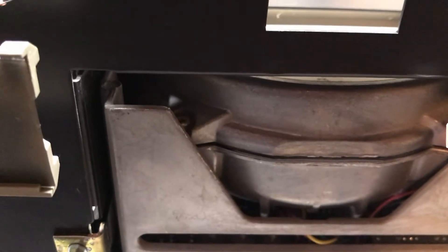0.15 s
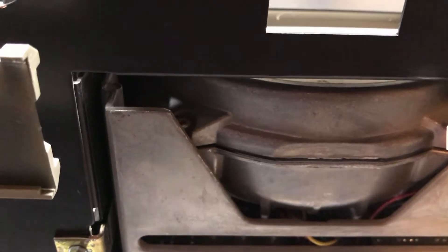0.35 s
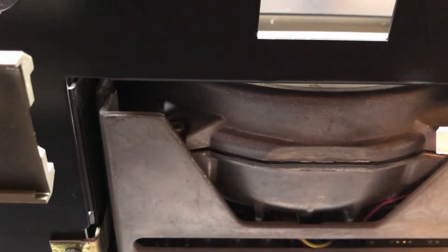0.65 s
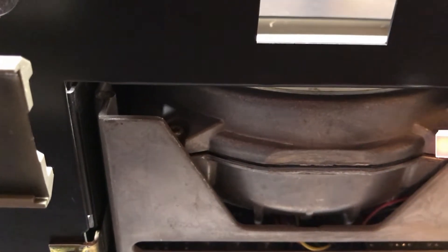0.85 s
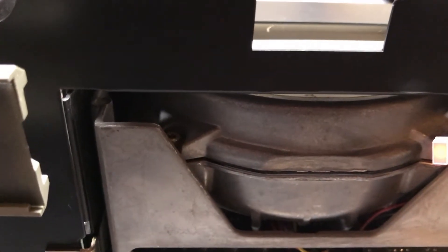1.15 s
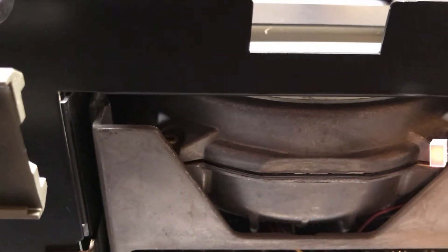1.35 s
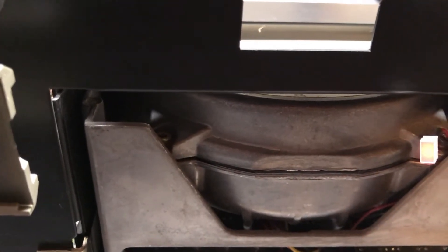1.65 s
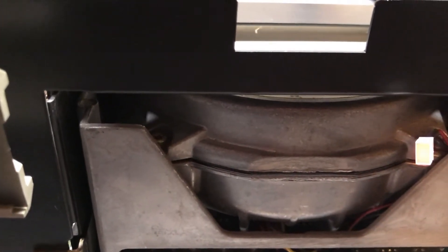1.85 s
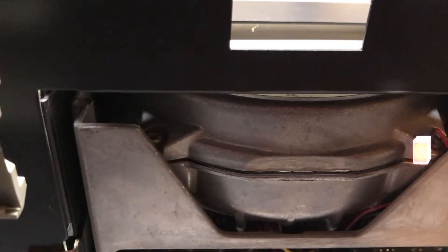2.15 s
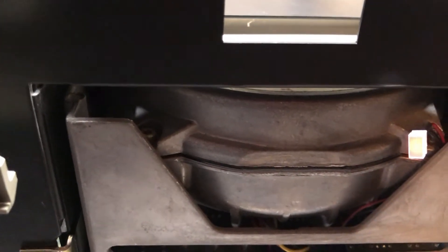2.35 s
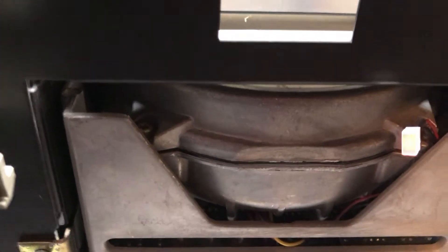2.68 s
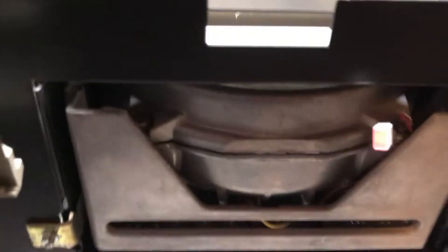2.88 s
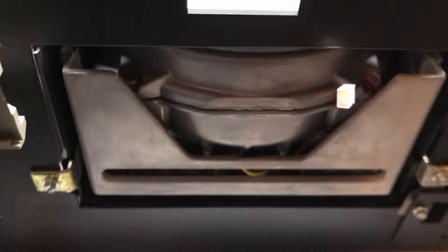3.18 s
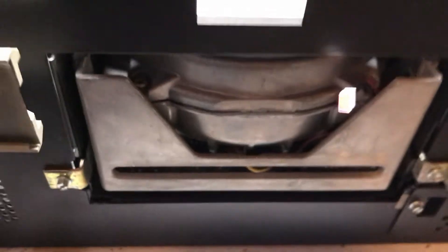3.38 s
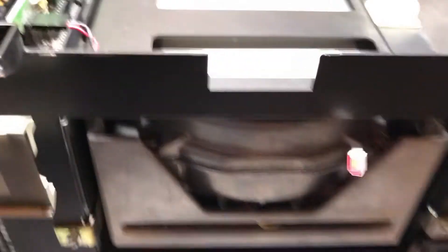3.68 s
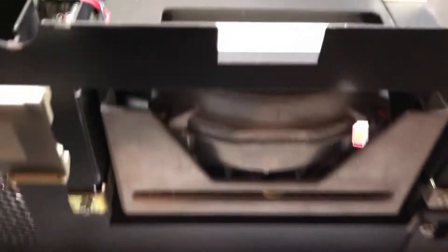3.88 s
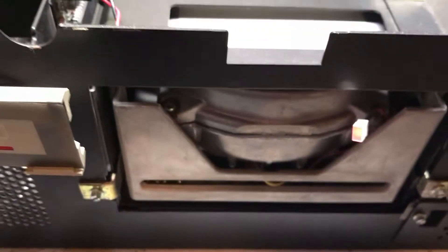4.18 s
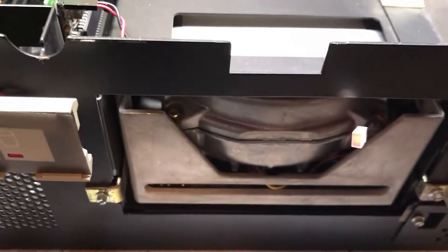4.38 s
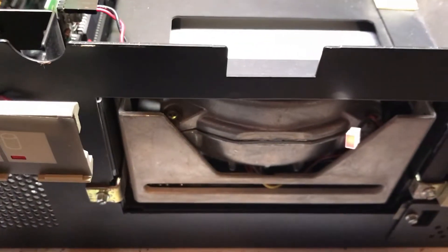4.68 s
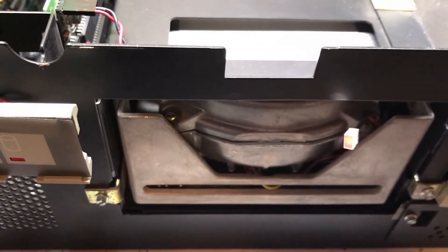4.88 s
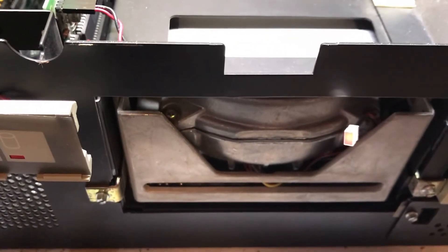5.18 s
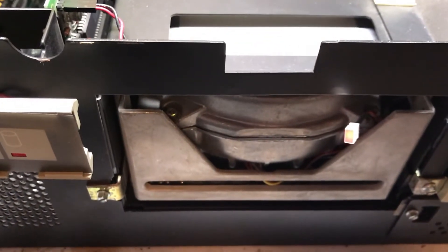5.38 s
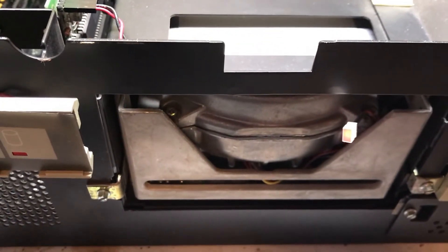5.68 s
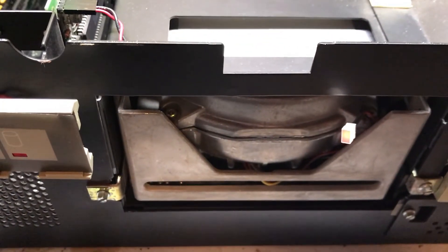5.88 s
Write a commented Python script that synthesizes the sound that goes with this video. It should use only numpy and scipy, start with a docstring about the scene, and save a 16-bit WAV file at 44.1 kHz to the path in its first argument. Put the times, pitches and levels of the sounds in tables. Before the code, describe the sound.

A running old hard drive is heard close up inside an open computer. Throughout, a low 60 Hz platter hum blends with whirring bearings, thin motor whine around 5 kHz, fan tones, airy rush and a faint, wavering whistle near 15.7 kHz. Two seeks rasp immediately at 0.0 s; pairs follow at 0.3 and 0.65 s, then three quick ones at 0.8 to 0.95 s. Each is a gritty metallic buzz of 10 to 35 milliseconds with sharp ticks and a dull low case thump. After a pause, pairs come near 1.6, 1.95, 2.3, 2.7 and 3.15 s, a short tick at 3.6, and a final cluster from 3.86 to 4.2 s. Then no more seeks. The microphone backs away, faster after 3 s, softening the whirr and whine. Tiny falling squeaks near 1 kHz appear around 0.5, 1.1, 3.3, 3.8, 4.3, 4.6, 5.4 and 6 s.

```python
"""Stepper-driven hard drive in an open computer

An old drive seeks in short bursts: each seek is a run of motor steps that rasps through the casting,
ticks in the head arm as it starts and lands, and rocks the chassis. Spindle, motor, bearings, two fans,
rushing air and a monitor whistle drone on as sines and shaped noise, with a few brief squeaks.
The balance of the drone shifts as the microphone draws back, slowly at first, faster after three seconds."""
import sys
import numpy as np
from scipy import signal
from scipy.fft import rfft, irfft
from scipy.io import wavfile
from scipy.ndimage import uniform_filter1d

SR = 44100
rng = np.random.default_rng(int(sys.argv[2]) if len(sys.argv) > 2 else 0)


def materialize(psi):
    """Save the field psi as 16-bit PCM at rate SR to the path in sys.argv[1].

    A 1-D psi becomes a single channel; in a 2-D psi each row is a channel.
    """
    bounded = np.clip(np.atleast_2d(psi).T, -1, 1)
    quanta = np.round(bounded * 32767).astype(np.int16)
    wavfile.write(sys.argv[1], SR, quanta)


N = 266364
T = np.arange(N) / SR  # time [s]
SPINDLE_HZ = 60  # turning rate of the platters
SWITCHES = 6  # switchings of the motor's coils per turn
BRAKE_S = .0065  # the brake bites hardest this long before the landing


def undb(db):
    """Amplitude ratio from its logarithmic level in decibels."""
    return 10 ** (np.asarray(db) / 20)


def unit(x):
    """Normalisation to unit rms, so that a later gain alone sets the level."""
    return x / np.sqrt(np.mean(x ** 2))


def curve(rows):
    """Linear interpolation of (time [s], value) rows."""
    return np.interp(T, *np.transpose(rows))


def walk(rate):
    """Slow random fluctuation: levels held 1 / rate seconds and smoothed twice; spread near 1."""
    hold = int(SR / rate)
    held = np.repeat(rng.standard_normal(N // hold + 1), hold)
    smooth = uniform_filter1d(uniform_filter1d(held, hold), hold)
    return 1.21 * smooth[:N]


def colour(x, points):
    """Spectral shaping by (frequency [Hz], level [dB]) points, with a fall below the first; unit rms."""
    hz, db = np.transpose(points)
    bins = np.arange(N // 2 + 1) * SR / N
    shape = undb(np.interp(np.log(bins + 1), np.log(hz), db))
    bass_fall = np.minimum(bins / hz[0], 1) ** 2
    return unit(irfft(rfft(x) * shape * bass_fall, N))


def add(track, start, sound):
    """Superposition of a sound on a track from a start time in seconds."""
    i = max(int(start * SR), 0)
    track[i:i + len(sound)] += sound[:max(N - i, 0)]


def ring(x, modes, case_db, case_t60):
    """Modal resonance: a force drives damped modes and dense case reflections, at unit response energy."""
    t = T[:SR // 8]
    body = np.zeros(len(t))
    for k, (hz, width, db) in enumerate(modes):
        # a wider resonance decays faster; alternate modes have opposite sign
        decay = np.exp(-np.pi * width * t)
        body += (-1) ** k * undb(db) * width * decay * np.cos(2 * np.pi * hz * t)
    case = rng.standard_normal(len(t)) * np.exp(-np.log(1000) * t / case_t60)
    case *= undb(case_db) / np.linalg.norm(case)
    case[0] += 1  # direct sound
    response = signal.fftconvolve(body, case)
    return signal.fftconvolve(x, response / np.linalg.norm(response))[:N]


def tone(hz, db, wander_hz, waver_db):
    """Sinusoid at an rms level, with slow random frequency and amplitude modulation."""
    phase = np.cumsum(hz + wander_hz * walk(4.88)) / SR + rng.random()
    return np.sqrt(2) * undb(db + waver_db * walk(3.88)) * np.sin(2 * np.pi * phase)


def spindle(away, hum_db=-41, db_per_octave=-12.5, away_db=-2):
    """Periodic rotation: the platters hum in a harmonic series that falls evenly per octave."""
    hum = np.zeros(N)
    for k in range(1, 5):
        hum += undb(db_per_octave * np.log2(k)) * np.sin(2 * np.pi * k * SPINDLE_HZ * T)
    return np.sqrt(2) * hum * undb(hum_db + away_db * away)


def motor_poles(away, pole_db=-58, sideband_db=-10, away_db=-7):
    """Amplitude modulation: the poles pull twice per switching, and the pull swells once a turn."""
    swell = 1 + 2 * undb(sideband_db) * np.cos(2 * np.pi * SPINDLE_HZ * T)
    return swell * tone(2 * SWITCHES * SPINDLE_HZ, pole_db + away_db * away, wander_hz=.2, waver_db=.2)


def motor_whine(away, centre_hz=5024, width_hz=337, peak_db=-59.5, away_db=-3.5):
    """Resonant selection: switching overtones, each with a partner two turning rates up, favour one band."""
    out = np.zeros(N)
    for overtone in range(12, 19):
        for hz in SPINDLE_HZ * (SWITCHES * overtone + np.array([0, 2])):
            detuning = 2 * (hz - centre_hz) / width_hz
            db = peak_db - 10 * np.log10(1 + detuning ** 2)  # resonance of the housing
            out += tone(hz, db, wander_hz=.2, waver_db=1.1)
    return out * undb(away_db * away)


def motor_sizzle(away, ring_hz=5120, width_hz=110, sizzle_db=-57, away_db=-8):
    """Impulsive excitation: each switching of the coils sends a decaying noise burst into the housing."""
    gate = np.exp(-3 * (SWITCHES * SPINDLE_HZ * T % 1))
    sizzle = ring(gate * rng.standard_normal(N), [(ring_hz, width_hz, 0)], case_db=14, case_t60=0.088)
    return unit(sizzle) * undb(sizzle_db + away_db * away)


def bearings(away, whirr_db=-51, away_db=-3, count=900):
    """Inharmonic superposition: rolling balls make many weak lines that flutter with each turn."""
    # spectrum of the whirr: (frequency [Hz], relative level [dB per Hz])
    whirr_spectrum = [(600, -13), (1500, 5), (2300, 4), (2900, 6), (3600, 6.5), (4000, -4), (4600, -19),
                      (5500, -23), (6400, -2.5), (7700, -22.5), (9200, -4), (12800, -52), (13600, -3),
                      (15000, -43)]
    lines = np.zeros(N // 2 + 1, complex)
    places = rng.integers(N // 80, N // 3, count)
    phases = np.exp(2j * np.pi * rng.random(count))
    lines[places] = phases * undb(3 * rng.standard_normal(count))
    whirr = colour(unit(irfft(lines, N)) + .5 * rng.standard_normal(N), whirr_spectrum)
    turn = 2 * np.pi * SPINDLE_HZ * T
    flutter = 1 + 0.04 * np.sin(turn) + 0.032 * np.sin(2 * turn)
    return whirr * flutter * undb(whirr_db + away_db * away + 0.2 * walk(4.6))


def races(away, gain_db=2.0, away_db=-5.5):
    """Tonal radiation: the bearing races sing a few clear tones that fade with distance."""
    # tones of the races: (frequency [Hz], level before gain_db [dB])
    race_tones = [(1463, -67), (1929.7, -65), (2946.9, -63), (3496.3, -64), (3582.9, -65)]
    tones = sum(tone(hz, db, wander_hz=.2, waver_db=.6) for hz, db in race_tones)
    return tones * undb(gain_db + away_db * away)


def fan(away, blade_hz, overtones):
    """Blade-passing tones: harmonics of the blade rate, each with its own level close and drawn back."""
    out = np.zeros(N)
    for multiple, close_db, far_db in overtones:
        db = close_db + (far_db - close_db) * away
        out += tone(round(multiple) * blade_hz, db, wander_hz=.2, waver_db=.6)
    return out


def air(away, air_db=-49, away_db=-1):
    """Broadband flow noise: cooling air rushes through the case as coloured noise."""
    # spectrum of the rush: (frequency [Hz], relative level [dB per Hz])
    air_spectrum = [(150, 3.5), (280, -4), (400, 3), (480, -5.5), (620, -8), (950, -3), (1200, -12.5),
                    (3300, -15), (4200, -12), (6500, -21.5), (8000, -28.5), (14200, -21.5), (15000, -10.5)]
    rush = colour(rng.standard_normal(N), air_spectrum)
    return rush * undb(air_db + away_db * away + 0.11 * walk(3.6))


def monitor(line_hz=15700, gain_db=4):
    """Line-rate whistle of a picture tube, heard through its standing waves as the microphone moves."""
    # swelling and fading of the whistle: (time [s], level before gain_db [dB])
    whistle_level = [(0.0, -58), (0.76, -65), (1.98, -58), (2.14, -61), (2.88, -54), (3.04, -63),
                     (3.13, -50), (3.4, -54), (3.65, -48), (3.83, -60), (4.07, -51), (4.42, -80),
                     (4.59, -57), (5.15, -57), (5.82, -76), (6.04, -70)]
    return tone(line_hz, curve(whistle_level) + gain_db, wander_hz=.3, waver_db=.3)


def moves():
    """Kinematics of the arm: each seek as (start [s], travel [s], strength [dB], recoil)."""
    # seeks: (start [s], landing [s], strength [dB], recoil of the chassis [relative])
    # positive recoil swells the platters' hum, negative recoil cancels it
    seek_times = [(0.01, 0.028, -1, 0.65), (0.045, 0.075, 2, -0.72), (0.317, 0.346, 0.5, 1),
                  (0.368, 0.399, 1, 0.049), (0.629, 0.66, 0, 0.37), (0.689, 0.72, -0.5, 0.12),
                  (0.786, 0.816, 0.5, 0.7), (0.838, 0.863, 0, -0.37), (0.937, 0.949, -0.5, -0.47),
                  (1.591, 1.625, 0, 0.21), (1.646, 1.662, 0, -0.96), (1.94, 1.956, 0, -0.72),
                  (1.965, 1.983, -1, 0.32), (2.28, 2.297, 0, 0.88), (2.307, 2.341, 0, 0.5),
                  (2.694, 2.728, 0.5, 0.98), (2.754, 2.772, -1, -0.018), (3.134, 3.151, -1, 0.68),
                  (3.17, 3.204, 0, 0.3), (3.619, 3.627, -1.5, -0.48), (3.859, 3.891, -0.5, -0.22),
                  (4.002, 4.038, -1, 0.18), (4.101, 4.135, -0.5, 0.12), (4.16, 4.168, -6, 0.12),
                  (4.176, 4.204, -1.5, 0.55)]
    return [(start, max(landing - start, .002), db, recoil) for start, landing, db, recoil in seek_times]


def doublings(travel):
    """Logarithmic length of a move in doublings of a full 32 ms stroke; negative for shorter ones."""
    return np.log2(travel / .032)


def at_track(modes, scatter_db=1.0):
    """Modal participation: each place of the arm feeds the modes a little differently, at random."""
    return [(hz, width, db + scatter_db * rng.standard_normal()) for hz, width, db in modes]


def step_run(t, travel, slow_hz=900, fast_hz=2900, ramp_s=.016, uneven_db=4.5, grit=0.88,
             jolt=1.0, jolt_s=0.004, swell_s=0.011, settle_s=0.0067):
    """Pulse-train excitation: a jolt, then uneven steps that speed up and brake, swelling near the landing."""
    end = travel + settle_s
    speed = np.clip(np.minimum(t, 2 * (end - t)) / ramp_s, 0, 1)
    # the rotor hunts about each step, so the pulses come unevenly
    hunting = .18 * unit(uniform_filter1d(rng.standard_normal(len(t)), size=24))
    rate = (slow_hz + (fast_hz - slow_hz) * speed) * np.exp(hunting)
    pulses = np.diff(np.floor(np.cumsum(rate) / SR), prepend=-1)
    steps = pulses * undb(uneven_db * rng.standard_normal(len(t)))
    force = unit(steps - uniform_filter1d(steps, size=64)) + grit * rng.standard_normal(len(t))
    braking = .9 * np.exp(-((t - travel + BRAKE_S) / swell_s) ** 2)
    stop = np.clip((end - t) / 0.001, 0, 1)
    run = force * (1 + jolt * np.exp(-t / jolt_s) + braking) * stop
    return run / np.sqrt(np.mean(run[t < end] ** 2))


def arm_ticks(t, travel, start_db=-6, start_s=0.003, slide_db=-14, brake_db=-5, land_s=0.0033):
    """Impact and friction noise: the band snaps taut, scrapes, clacks under the brake and chatters to rest."""
    snap = undb(start_db) * np.exp(-(t / start_s) ** 2)
    slide = undb(slide_db) * np.clip(t / travel, 0, 1) * (t < travel)
    clack = undb(brake_db) * np.exp(-((t - travel + BRAKE_S) / 0.0006) ** 2)
    landing = np.exp(-np.abs(t - travel + 0.0004) / land_s)
    return (snap + slide + clack + landing) * rng.standard_normal(len(t))


def seeks(rasp_db=-39, rasp_db_per_doubling=1.0, tick_db=-42):
    """Forced resonance: steps ring the casting, ticks ring the arm; longer moves rasp louder."""
    # resonances of the drive casting: (frequency [Hz], width [Hz], level before scatter [dB])
    casting_modes = [(817, 196, -2), (1119, 48, 2), (1420, 110, 0), (2121, 111, 1), (2464, 154, -5),
                     (2700, 167, -1), (3065, 108, -1), (3240, 240, -4), (3760, 180, -1), (4670, 240, -9.5),
                     (6000, 2600, -19), (11450, 280, -30)]
    # resonances of the head arm and its steel band: (frequency [Hz], width [Hz], level before scatter [dB])
    arm_modes = [(3870, 370, 3), (4940, 810, -12), (7000, 990, -11), (7760, 490, -3), (9200, 1600, -5),
                 (10400, 700, -4), (11200, 300, 3.5), (12300, 1100, -7), (13600, 820, -8.5)]
    t, out = T[:SR // 14], np.zeros(N)
    for start, travel, db, _ in moves():
        rasp = ring(step_run(t, travel), at_track(casting_modes), case_db=-8, case_t60=.07)
        ticks = ring(arm_ticks(t, travel), at_track(arm_modes), case_db=-8, case_t60=.04)
        # shorter moves never reach full speed
        rasp_gain = undb(db + rasp_db + rasp_db_per_doubling * doublings(travel))
        add(out, start, rasp_gain * rasp + undb(db + tick_db) * ticks)
    return out


def chassis(rock_hz=61, rock_db=-46, rumble_db=-49.5, rumble_db_per_doubling=0.2,
            follow_s=.08, follow_db=2, shake_s=.04):
    """Reaction force: the arm's recoil rocks the drive on its mounts and makes the panels rumble."""
    # resonances of the case panels: (frequency [Hz], width [Hz], level [dB])
    panel_modes = [(75, 10.6, 2), (144.3, 21, 1.5), (160, 14, -2), (195.2, 8.7, -2.5), (227, 23, -12)]
    push, shake, previous = np.zeros(N), np.zeros(N), -np.inf
    for start, travel, db, recoil in moves():
        # seeks fall in step with the platters, so the rocking swells or cancels their hum
        turns = np.ceil(start * SPINDLE_HZ) + np.arange(3)
        push[(turns * SR / SPINDLE_HZ).astype(int)] += recoil
        # a seek soon after the last finds the panels still moving and shakes them harder
        follow = follow_db * (start - previous < follow_s)
        shake_db = db + rumble_db + rumble_db_per_doubling * doublings(travel) + follow
        shaking = T[:SR // 8] < travel + shake_s  # lasts beyond the landing
        add(shake, start, undb(shake_db) * shaking * rng.standard_normal(len(shaking)))
        previous = start
    t = T[:SR // 2]
    mounts = np.sin(2 * np.pi * rock_hz * t) * np.exp(-np.log(1000) * t / .4)
    rocking = undb(rock_db) * signal.fftconvolve(push, mounts)[:N]
    return rocking + ring(shake, panel_modes, case_db=-10, case_t60=.12)


def squeaks(gain_db=-3, fall=0.11, rough=0.024, length_s=0.042):
    """Frequency modulation: soft, slightly rough chirps that sink in pitch."""
    # squeaks, perhaps of a dry fan bearing, each begun 8 ms before its time:
    # (time [s], peak level before gain_db [dB], mid-chirp frequency [Hz])
    chirps = [(0.54, -50, 986), (1.082, -46, 1007), (3.275, -43, 940), (3.79, -41, 964), (4.33, -49, 1010),
              (4.625, -46, 893), (5.419, -45, 980), (5.99, -44, 900)]
    out, unsteady = np.zeros(N), walk(200)
    u = np.linspace(0, 1, int(length_s * SR))
    swell = np.sin(np.pi * u ** 0.64)
    for start, db, hz in chirps:
        roughness = rough * np.roll(unsteady, -int(start * SR))[:len(u)]
        pitch = hz * (1 + fall * (.5 - u) + roughness)
        chirp = np.sin(2 * np.pi * np.cumsum(pitch) / SR)
        add(out, start - .008, undb(db + gain_db) * swell * chirp)
    return out


def scene():
    """Linear superposition of the drive at work and the drone of the machine."""
    # microphone position: (time [s], distance [0 close .. 1 drawn back])
    position = [(0, 0.035), (2.8, 0.3), (3.3, 0.44), (3.8, 0.6), (4.4, 0.75), (6.04, 0.84)]
    # overtones of each fan: (multiple of the blade rate, level close [dB], level drawn back [dB])
    slow_fan = [(3, -65, -67.5), (4, -52.5, -55), (6, -56, -58.5), (8, -76, -65.5), (9, -60, -65.5)]
    fast_fan = [(2, -58, -56), (5, -61.5, -49.5), (6, -83, -62.5), (7, -68.5, -69.5)]
    away = curve(position)
    motor = motor_poles(away) + motor_whine(away) + motor_sizzle(away)
    drive = spindle(away) + motor + bearings(away) + races(away)
    fans = fan(away, 212.07, slow_fan) + fan(away, 264.31, fast_fan)  # blade-passing rates [Hz]
    cooling = fans + air(away) + squeaks()
    return (drive + cooling + monitor() + seeks() + chassis())[None]


def record(dry):
    """Band limiting: the microphone loses the deepest bass; the recorder cuts the top."""
    bass_cut = signal.butter(2, 30, "high", fs=SR, output="sos")
    top_cut = signal.ellip(10, .1, 80, 15900, fs=SR, output="sos")
    heard = signal.sosfilt(bass_cut, dry)
    return signal.sosfilt(top_cut, heard)


dry = scene()
out = record(dry)
materialize(out)
```